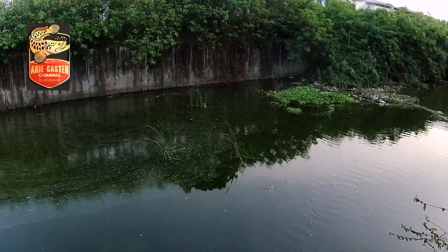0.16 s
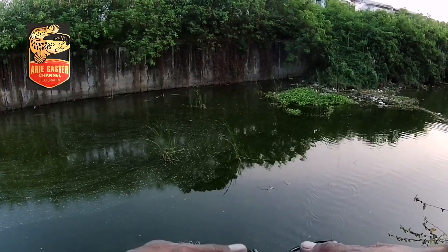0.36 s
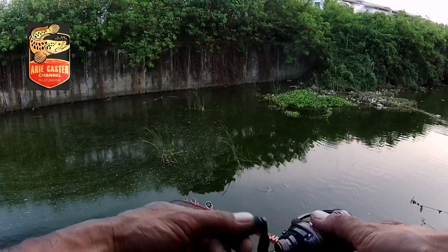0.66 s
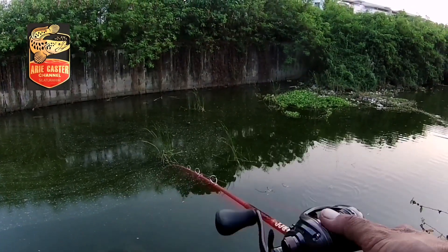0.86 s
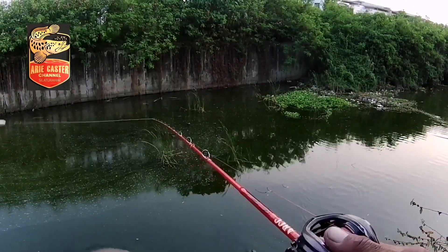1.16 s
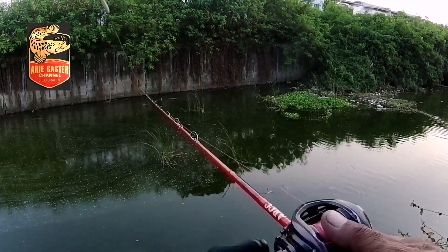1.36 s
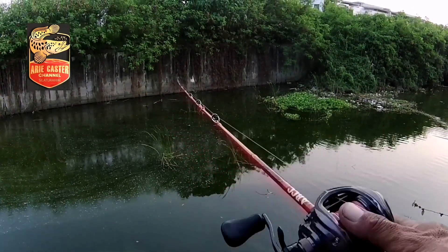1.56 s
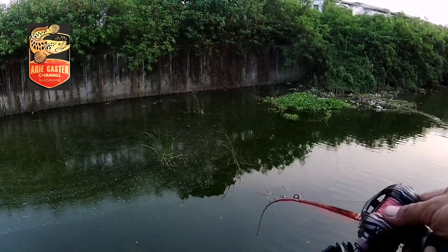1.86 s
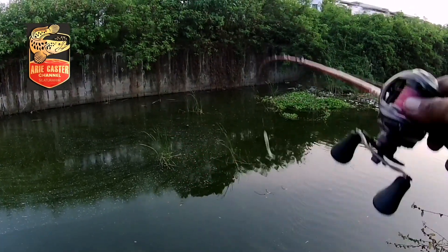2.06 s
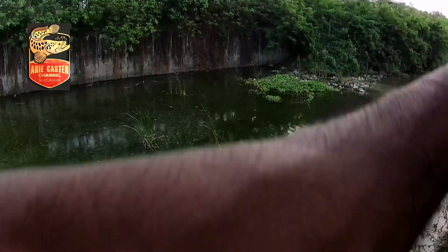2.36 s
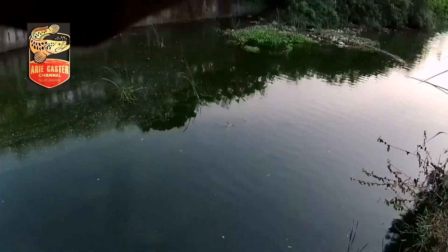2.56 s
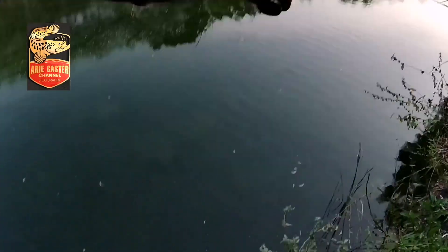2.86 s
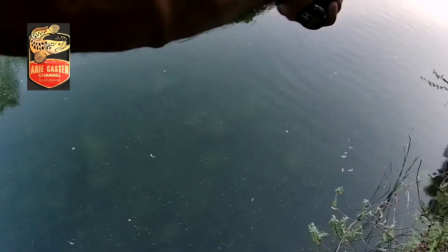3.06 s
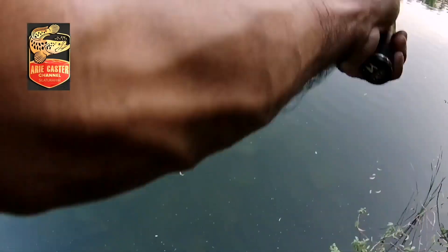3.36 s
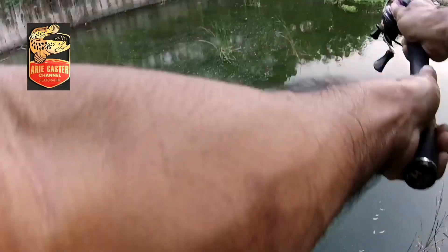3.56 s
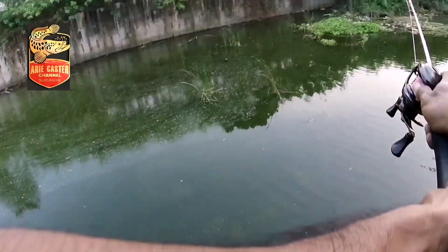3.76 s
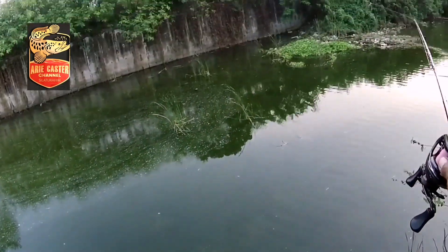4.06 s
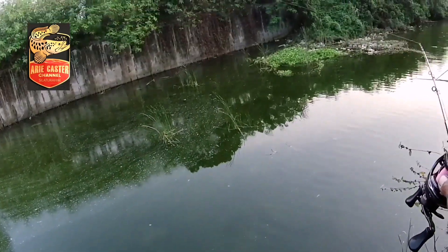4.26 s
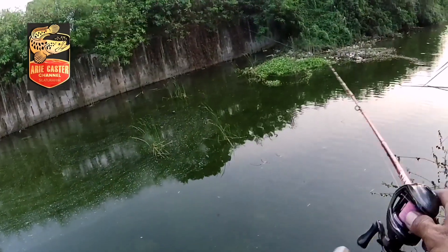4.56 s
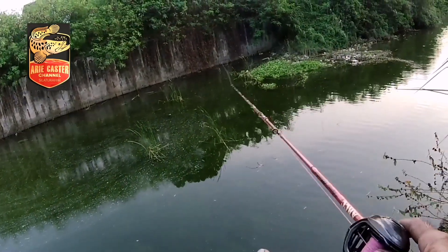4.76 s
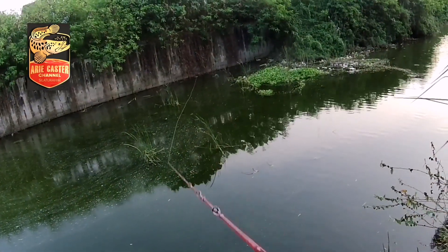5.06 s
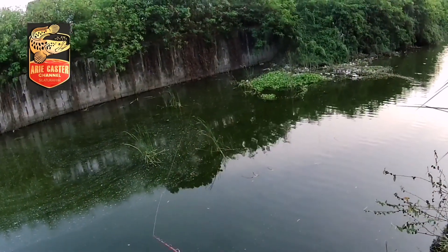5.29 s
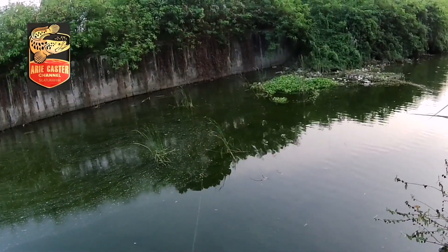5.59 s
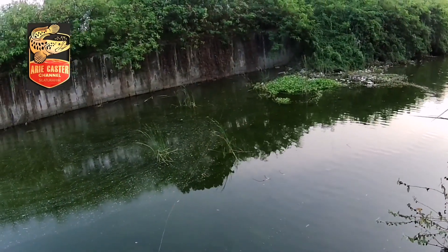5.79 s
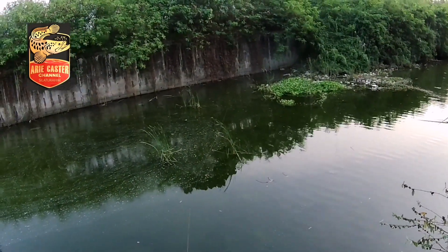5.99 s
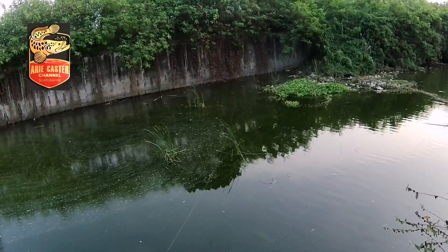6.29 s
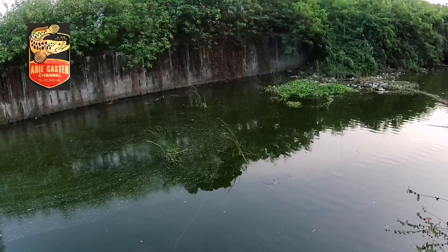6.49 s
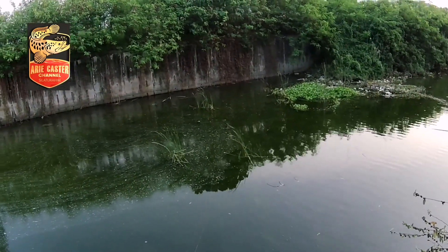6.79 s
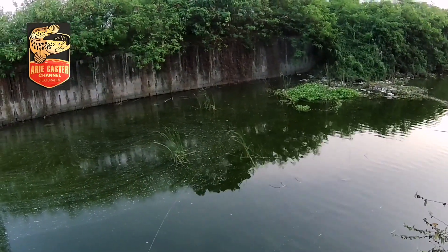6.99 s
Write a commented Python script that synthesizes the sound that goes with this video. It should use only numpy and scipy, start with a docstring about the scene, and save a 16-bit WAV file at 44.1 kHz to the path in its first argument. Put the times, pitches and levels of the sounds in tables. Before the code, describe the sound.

Mono, close and dry, heard from a small chest microphone beside a still canal, over a soft steady hush of far rumble, leaves and hiss. From 0 to 1.6 s hands rub the reel faintly, with small metallic ticks, clearest around 1.1 s. At 1.7 s line gives a tiny unsteady squeak, rising quickly, and at 1.88 s comes a crisp click. Very faint high peeps and a soft knock occur between 2.2 and 2.8 s. At about 2.85 s the rod whips forward: a short low buffet and climbing swish, dull thumps at 2.9 s, bright ticks to 3.0 s. The spool bursts into a bright, throbbing whir with thin line hiss, quickly softer, slowing and fading until 4.4 s with faint knocks. Quiet follows, then at 5.2 s the clutch snaps in, by far the loudest sound, with a tiny rattle. Two weak ticks follow before 5.7 s; only hush remains to about 7 s.

```python
"""Casting a fishing reel

A cast beside a still canal, heard by a small microphone on the chest. Hands rub the reel as filtered noise,
metal contacts ring the reel frame, and arm and rod throw gusts of gliding noise over the microphone.
The spool whirs as slaps and noise that follow its slowing turns, then the clutch snaps back in.
A squeak of line, dull knocks, faint peeps and a soft outdoor hush of coloured noise complete it."""
import sys
import numpy as np
from scipy import signal
from scipy.fft import rfft, irfft, next_fast_len
from scipy.io import wavfile

SR = 44100
rng = np.random.default_rng(int(sys.argv[2]) if len(sys.argv) > 2 else 0)


def materialize(psi):
    """Save the field psi as 16-bit PCM at rate SR to the path in sys.argv[1].

    A 1-D psi becomes a single channel; in a 2-D psi each row is a channel.
    """
    bounded = np.clip(np.atleast_2d(psi).T, -1, 1)
    quanta = np.round(bounded * 32767).astype(np.int16)
    wavfile.write(sys.argv[1], SR, quanta)


N = 314740
TIME = np.arange(N) / SR   # seconds


def spool():
    """Line slaps the guide as the spool turns, over a throbbing rush; hiss, bearing song and plate hum join."""
    # How the spool slows. Each row: time in seconds, turns per second, share of regular slaps from 0 to 1.
    turning = [(2.9, 300, .03), (3.1, 286, .1), (3.27, 254, .36), (3.42, 198, .32), (3.48, 196, .42),
               (3.57, 185, .4), (3.64, 168, .35), (3.78, 147, .25), (3.9, 122, .15), (3.95, 100, .1),
               (4.06, 86, .1), (4.15, 77, .05), (4.4, 66, .05)]
    # Loudness of the whir, a burst and then a slow fade. Each row: time in seconds, level in dB.
    whir_levels = [(2.9, -52), (2.928, -60), (2.94, -34), (2.975, -35), (3.012, -39.5), (3.042, -51.5),
                   (3.07, -47.5), (3.3, -48), (3.39, -49), (3.45, -50), (3.5, -58), (3.72, -57),
                   (4.05, -59), (4.14, -64.5), (4.4, -69)]
    # Tone colour of the whir. Each row: frequency in Hz, relative level in dB per Hz.
    whir_colour = [(900, -37), (1600, -19), (2300, -18), (3000, -11.5), (3800, -3.5), (4300, 2),
                   (5000, 0.5), (5500, -7.5), (6300, -20.5), (7400, -15.5), (9000, -18.5), (11000, -24),
                   (13000, -42), (16000, -40)]
    # Thin hiss of line in the guides. Each row: time in seconds, centre in Hz, width in Hz, level in dB.
    line_hiss = [(2.93, 7500, 4035, -75), (2.97, 8240, 4980, -61), (3.04, 8550, 3940, -70),
                 (3.08, 8400, 4510, -58.5), (3.2, 9600, 3586, -57.5), (3.33, 10500, 2560, -63),
                 (3.43, 11800, 2010, -56), (3.5, 11100, 1500, -63), (3.6, 10660, 1830, -62.5),
                 (4.0, 10000, 3010, -75.5)]

    rate, share = in_time(turning)
    turn = np.cumsum(rate * (1 + .002 * drift(40))) / SR
    throb = np.exp(.5 * np.cos(2 * np.pi * turn))

    # a second, weaker slap wanders around the turn, so single overtones swell and fade
    first = slap_train(turn, rate)
    second = slap_train(turn + .3 + .02 * drift(6), rate)
    slaps = band((first + .7 * second) * from_db(2.0 * drift(80)), 300, 7000)
    rush = throb * grains(2.5)
    mix = np.sqrt(share) * rms_one(slaps) + np.sqrt(1 - share) * rms_one(rush)

    # the loudness nods up and down, most strongly at one moment
    nod_s, nod_hz, nod_top_db, nod_fade_s = 3.17, 7.7, 3, .25
    since = TIME - nod_s
    nod_db = nod_top_db * np.cos(2 * np.pi * nod_hz * since) * np.exp(-np.abs(since) / nod_fade_s)
    nod_db = nod_db * (since > -.5 / nod_hz)

    whir_db = in_time(whir_levels)[0] + nod_db + 1.2 * drift(20)
    whir = colour(mix, whir_colour) * from_db(whir_db) * sounding(whir_levels)
    hz, width_hz, db = in_time(line_hiss)
    hiss = moving_band(hz, width_hz) * from_db(db + nod_db + 1.1 * drift(200)) * sounding(line_hiss)
    return whir + (hiss + bearing(rate) + plate(rate)) * throb * from_db(0.51 * drift(45))


def slap_train(turn, rate):
    """One click each time the count of turns passes a whole number, softer when the spool is fast."""
    from_whole = np.abs((turn + .5) % 1 - .5)
    return np.maximum(1 - from_whole * SR / rate, 0) / np.sqrt(rate)


def bearing(rate):
    """The bearing sings on a multiple of the turning rate; near a part that rings along, it bends and swells."""
    # Parts that ring along. Each row: pitch in Hz, reach in Hz, added level in dB, hold on the pitch from 0 to 1.
    ringing_parts = [(8470, 150, -81, 0.2), (6730, 240, -56.5, 0.87), (4900, 270, -49.5, 0.43),
                     (3850, 100, -65, 0.27)]
    multiple, start_s, end_s, free_db = 53.0, 3.67, 4.3, -72
    wide_hz, narrow_hz = 900, 259.6
    free_hz = multiple * rate
    hz, near, gain = free_hz, 0, from_db(free_db)
    for part_hz, reach_hz, db, hold in ringing_parts:
        close = np.exp(-((free_hz - part_hz) / (2 * reach_hz)) ** 2)
        hz = hz + hold * close * (part_hz - free_hz)
        near = near + close
        gain = gain + from_db(db) * close ** 2
    width_hz = wide_hz + (narrow_hz - wide_hz) * np.minimum(near, 1)
    return moving_band(hz, width_hz) * gain * between(start_s, end_s)


def plate(rate):
    """A side plate hums along: an overtone of the turning glides down onto its mode and stays there."""
    multiple, mode_hz, width_hz = 15.6, 2480, 200
    loudest_s, length_s, level_db = 3.72, .13, -63
    hum = moving_band(np.maximum(multiple * rate, mode_hz), np.full(N, width_hz))
    return hum * swells([loudest_s], [length_s], [level_db])


def ticks():
    """A contact chatters for a moment into all frame modes, hardest near its brightest pitch; then parts rattle."""
    # Metal contacts in the reel; the close group at 5.2 s is the clutch snapping in.
    # Each row: start in seconds, level in dB, brightest pitch in Hz,
    # loss in dB one octave away (it grows with the octaves squared; below 0 counts as 0), contact time in ms.
    metal_contacts = [(0.1111, -43, 4650, 19, 2.5), (.6863, -44.5, 4170, 13, 6.6),
                      (0.7326, -44.5, 4180, 21, 2.4), (0.9486, -38.5, 4160, 13, 1.6),
                      (1.0745, -30.5, 3430, 200, 8.1), (1.0765, -41, 8170, 200, 5),
                      (1.0790, -34.5, 6050, 400, 5.2), (1.1094, -37.5, 6400, 30, 2.5),
                      (1.112, -44.5, 2520, 25, 8.1), (1.1827, -45, 2800, 27, 12),
                      (1.2276, -44, 3580, 18, 6), (1.2625, -40.5, 4200, -3, 0.6),
                      (1.3793, -46.5, 4100, 6, 2), (1.4087, -46, 5500, 6, 2.5),
                      (1.5324, -43.5, 3530, 33, 4.3), (1.878, -60, 2700, 18, 1),
                      (1.8844, -16.5, 5400, 8.5, 0.17), (1.8892, -36, 5270, 5, 0.56),
                      (1.9015, -38, 5350, 30, 0.65), (1.9183, -39, 5500, 38, 0.56),
                      (2.8417, -33.5, 4760, 19, 2.6), (2.9447, -27, 4270, 25, 2.8),
                      (2.9584, -38, 4400, 8, 3.3), (2.972, -36, 6200, 20, 1.2), (2.986, -30, 4700, 4, 0.8),
                      (2.9957, -18.5, 4800, 37, 0.95), (3.0594, -35, 5500, 12, 3.6),
                      (3.1762, -34, 4570, 30, 6.4), (3.2111, -34, 4800, 14, 4.9),
                      (5.1362, -46.5, 6600, 24, 1.7), (5.1988, -16, 4200, 3, 1.1),
                      (5.2019, -1.5, 5030, 9, 0.67), (5.2029, -2, 5630, 9.5, 0.25),
                      (5.2052, -10.5, 6400, 20, 0.3), (5.2109, -7, 4200, 1.0, .15),
                      (5.2121, -10, 4300, 6, .6), (5.2110, -16.5, 2400, 40, 0.41),
                      (5.3322, -41.5, 4790, -2, 3.2), (5.6665, -45, 6500, 2.5, 1.4)]
    # Ringing modes of the reel frame. Each row: pitch in Hz, level in dB, seconds to fade by 60 dB.
    frame_modes = [(1850, -27.5, 0.0028), (2422, -8.5, 0.013), (2940, -16.5, 0.0035), (3360, -8.5, 0.011),
                   (3953, -3, 0.0064), (4228, 2, 0.0093), (4487, 2.5, 0.01), (4858, -10, 0.0081),
                   (5260, 4, 0.006), (5428, 0, 0.0056), (5880, -6, 0.0075), (7250, -9.5, 0.0064),
                   (7900, -10, 0.0066), (9650, -11.5, 0.0057), (11100, -7.5, 0.0049), (13600, -14, 0.0053),
                   (15400, -28, 0.00422)]
    # loose parts shiver on after a tick
    rattle_db, rattle_fade_s = -30, 0.15
    # the clutch spring bounces to rest: start, gap, first level and loss per bounce
    bounce_s, gap_s, bounce_db, loss_db = 5.215, .0048, -22.5, 7
    bounces = [(bounce_s + k * gap_s, bounce_db - k * loss_db, 5023, 5, 1.34) for k in range(5)]

    out = np.zeros(N)
    t = np.arange(round(.12 * SR)) / SR
    for s, db, bright_hz, fall_db, contact_ms in metal_contacts + bounces:
        chatter = rng.standard_normal(len(t)) * np.exp(-(1000 * t / contact_ms) ** 4)
        modes = 0
        for hz, mode_db, t60 in frame_modes:
            strength_db = mode_db - max(fall_db, 0) * np.log2(hz / bright_hz) ** 2
            modes = modes + from_db(strength_db - 60 * t / t60) * np.sin(2 * np.pi * hz * t)
        soft = modes * np.minimum(t / 0.00055, 1) ** 2   # the metal gives a little, so the rings swell
        struck = signal.fftconvolve(chatter, soft)[:len(t)]
        piece = band(band(struck, 1700, 19000), 1500, 19000)
        rattle = rng.standard_normal(len(t)) * from_db(rattle_db - 60 * t / rattle_fade_s)
        rattle = band(rattle, 3800, 5500)
        add(out, s, from_db(db) * (piece / np.abs(piece).max() + rattle))
    return out


def whip():
    """Arm and rod throw air: lumpy low buffeting, a swish above it, and the climbing swish of the rod tip."""
    # Gusts over the microphone. Each row: strongest moment in seconds, length in seconds,
    # buffeting level in dB, swish level in dB.
    gusts = [(2.647, 0.28, -69, -72.5), (2.8, 0.058, -56, -60.5), (2.835, 0.027, -42.5, -56),
             (2.86, 0.044, -37.5, -48), (2.944, 0.037, -40, -42.5), (2.98, .05, -48, -57),
             (3.017, .05, -47, -50.5), (3.051, 0.055, -45, -49), (3.151, .07, -55, -49.5),
             (3.252, 0.21, -63, -61), (3.7, 0.27, -68, -64), (3.922, 0.15, -61.5, -64.5),
             (4.115, 0.19, -71, -63.5)]
    s, length, buffet_db, swish_db = np.transpose(gusts)
    buffet = rms_one(band(band(rng.standard_normal(N), 70, 220), 55, 500))
    buffet = buffet * swells(s, length, buffet_db) * from_db(2.8 * drift(36))

    # each swish band is as wide as its centre is high
    steady_hz = np.full(N, 760.5)
    swish = moving_band(steady_hz, steady_hz) * swells(s, length, swish_db)

    # in the forward stroke the rod tip speeds up and its own swish climbs
    start_s, end_s, start_hz, end_hz, tip_db = 2.855, 2.895, 700, 2300, -49
    tip_hz = np.exp(np.interp(TIME, [start_s, end_s], np.log([start_hz, end_hz])))
    tip = moving_band(tip_hz, tip_hz) * from_db(tip_db) * between(start_s, end_s)
    return buffet + (swish + tip) * from_db(2.9 * drift(69))


def rubbing():
    """Hands and line rub on reel and rod: uneven grains of noise heard through broad rings of the frame."""
    # Single strokes. Each row: loudest moment in seconds, length in seconds, level in dB.
    strokes = [(0.0, 0.066, -55.5), (0.077, 0.075, -57.5), (.3, 0.68, -69), (0.67, 0.15, -61),
               (.755, 0.057, -58.5), (0.96, 0.25, -61.5), (1.1, .1, -59.5), (1.216, .13, -62),
               (1.344, 0.12, -62.5), (1.524, 0.037, -60), (1.767, 0.06, -60), (1.83, .04, -57),
               (1.902, 0.091, -61), (2.328, 0.046, -59.5), (2.805, .05, -58), (2.853, 0.087, -54.5),
               (2.934, 0.053, -49)]
    rub = grains(2.2)
    body = band(rub, 3700, 5600) + .8 * band(rub, 2300, 3200)
    return rms_one(body) * swells(*np.transpose(strokes))


def knocks():
    """A soft push of half a cycle rings one damped note and its upper neighbour."""
    # Dull knocks of the rod butt and of clothing near the microphone.
    # Each row: start in seconds, peak level in dB, pitch in Hz, seconds to fade by 60 dB.
    dull_knocks = [(.236, -50.5, 870, 0.022), (2.569, -49, 800, 0.029), (2.569, -42, 1990, 0.0019),
                   (2.9043, -25, 427, 0.032), (2.9086, -18, 1090, 0.0011), (2.9096, -18, 420, 0.028),
                   (2.9274, -14, 374, 0.0095), (3.182, -35, 630, 0.0086), (3.185, -27, 710, 0.018),
                   (3.21, -43, 500, 0.0064), (3.255, -45.5, 994, 0.056), (3.307, -45.5, 1120, 0.054),
                   (3.640, -47, 735, 0.018), (3.645, -48, 168, 0.016), (3.861, -51, 800, 0.015),
                   (3.956, -46.5, 790, 0.047), (4.061, -43.5, 860, 0.027), (4.099, -45, 800, 0.027),
                   (4.118, -51.5, 690, 0.048), (4.181, -42, 900, 0.026), (4.23, -46, 955, 0.015),
                   (4.377, -44.5, 220, .023), (5.203, -45, 810, 0.0096), (4.718, -46.5, 660, 0.011)]
    out = np.zeros(N)
    t = np.arange(round(.08 * SR)) / SR
    for s, db, hz, t60 in dull_knocks:
        push = -np.sin(np.pi * np.minimum(2 * hz * t, 1)) ** 2
        piece = ring(push, hz, t60) + .4 * ring(push, 1.7 * hz, .7 * t60)
        add(out, s, from_db(db) * piece / np.abs(piece).max())
    return out


def squeak():
    """Line sticks and slips over the thumb: an unsteady, throbbing tone, with a scrape that grows under it."""
    # The glide of the squeak. Each row: time in seconds, base pitch in Hz, level in dB before the partials' own.
    glide = [(1.69, 1020, -70), (1.706, 1135, -54), (1.722, 1247, -48), (1.745, 1295, -49),
             (1.754, 1290, -51), (1.762, 1260, -66)]
    hz, db = in_time(glide)
    phase = 2 * np.pi * np.cumsum(hz * (1 + 0.0228 * drift(250))) / SR
    tone = 0
    for multiple, partial_db in [(2, -30), (3, -7), (4, 2), (5, -12)]:
        tone = tone + from_db(partial_db + 3.7 * drift(150)) * np.sin(multiple * phase)
    scrape = rms_one(band(grains(3.3), 4240, 4600)) * np.clip((TIME - 1.715) / 0.019, 0, 1)
    return from_db(db) * sounding(glide) * (tone + 1.05 * scrape)


def peeps():
    """Short pure notes that rise a little."""
    # Faint peeps, perhaps a far bird.
    # Each row: start in seconds, length in seconds, pitch in Hz, rise in Hz, level in dB.
    faint_peeps = [(2.193, .02, 2500, 30, -65), (2.26, .015, 2500, 30, -69), (2.36, 0.017, 2500, 40, -64),
                   (2.664, 0.023, 2476, 40, -60.5), (2.758, 0.013, 2450, 80, -61)]
    out = np.zeros(N)
    for s, length, hz, rise_hz, db in faint_peeps:
        share = np.linspace(0, 1, round(length * SR))
        shape = np.sqrt(2 * np.sin(np.pi * share).clip(0))
        note = np.sin(2 * np.pi * np.cumsum(hz + rise_hz * share) / SR)
        add(out, s, from_db(db) * shape * note)
    return out


def hush():
    """Far traffic, leaves and microphone hiss as one noise; bass and middle waver a little on their own."""
    # Tone colour of the outdoor hush. Each row: frequency in Hz, relative level in dB per Hz.
    hush_colour = [(20, -29.5), (45, -7), (80, -6), (120, 1), (150, -4.5), (200, -6.5), (380, -14.5),
                   (1200, -19), (1900, -17), (2700, -14.5), (3500, -15.5), (4800, -12), (6000, -20.5),
                   (7200, -25), (15700, -25.5)]
    still = colour(rng.standard_normal(N), hush_colour) * from_db(-59.5)
    bass = band(still, 40, 400) * .12 * drift(6)
    middle = band(still, 1800, 6000) * .07 * drift(8)
    return still + bass + middle


def moving_band(hz, width_hz):
    """Two slow noises on a sine and a cosine make a noise band that can glide; rms about 0.8."""
    steps = np.cumsum(width_hz) / SR   # a wider band runs through its random values faster
    knots = rng.standard_normal((2, int(8000 * N / SR)))
    a, b = [np.interp(steps, np.arange(knots.shape[1]), row) for row in knots]
    phase = 2 * np.pi * np.cumsum(hz) / SR
    return a * np.sin(phase) + b * np.cos(phase)


def swells(s, length, db):
    """Gain over time of events that each rise to a peak and die away."""
    rise, fall = 0.49, 0.62   # shares of a length in which a swell gains, then loses, 10 dB
    power = np.zeros(N)
    for at, span, top in zip(s, length, db):
        near = slice(max(round((at - 2 * span) * SR), 0), max(round((at + 2 * span) * SR), 1))
        away = np.maximum((at - TIME[near]) / rise, (TIME[near] - at) / fall) / span
        power[near] += from_db(top - 10 * away ** 1.75) ** 2
    return np.sqrt(power)


def ring(push, hz, t60):
    """A resonance: a unit click would set a sine of about height 1 ringing and fading."""
    r, w = from_db(-60 / (t60 * SR)), 2 * np.pi * hz / SR
    return signal.lfilter([0, np.sin(w)], [1, -2 * r * np.cos(w), r * r], push)


def grains(spread_db):
    """Dense noise of uneven grain sizes."""
    return rng.standard_normal(N) * from_db(spread_db * drift(450))


def drift(rate):
    """Smooth random wandering of rms 1, slower for a lower rate in Hz."""
    r = np.exp(-2 * np.pi * rate / SR)
    wander = signal.lfilter([1], [1, -2 * r, r * r], rng.standard_normal(N + SR))
    return rms_one(wander[SR:])   # the first second lets the filter settle


def colour(x, spectrum):
    """Give a steady noise a spectrum; rms 1."""
    size = next_fast_len(N)
    hz = np.maximum(np.arange(size // 2 + 1) * SR / size, 1)
    points = np.array(spectrum)
    db = np.interp(np.log(hz), np.log(points[:, 0]), points[:, 1])
    return rms_one(irfft(rfft(x, size) * from_db(db), size)[:N])


def band(x, low_hz, high_hz):
    """Keep only the sound between two frequencies, with soft edges."""
    return signal.sosfilt(signal.butter(2, [low_hz, high_hz], "band", fs=SR, output="sos"), x)


def in_time(rows):
    """Each column after the time as a value per sample."""
    s, *columns = np.transpose(rows)
    return [np.interp(TIME, s, c) for c in columns]


def sounding(rows):
    """1 inside the time span of a table, with short fades."""
    return between(rows[0][0], rows[-1][0])


def between(start_s, end_s):
    """1 inside a span, with 10 ms fades in and out at its ends."""
    return np.clip(np.minimum(TIME - start_s, end_s - TIME) / .01, 0, 1)


def from_db(db):
    """Decibels to gain."""
    return 10 ** (np.asarray(db) / 20)


def rms_one(x):
    """Scale to rms 1."""
    return x / np.sqrt(np.mean(x ** 2) + 1e-20)


def add(out, s, piece):
    """Mix a short sound in at time s."""
    at = round(s * SR)
    out[at:at + len(piece)] += piece[:N - at]


def scene():
    """All sources, one channel."""
    reel = spool() + ticks() + rubbing() + squeak()
    return (reel + whip() + knocks() + peeps() + hush())[None]


def record(dry):
    """The loudest peaks are rounded, and the treble above 15.8 kHz is cut."""
    rounded = dry / (1 + np.abs(dry / .95) ** 6) ** (1 / 6)
    return signal.sosfilt(signal.ellip(10, .5, 70, 15800, fs=SR, output="sos"), rounded)


dry = scene()
out = record(dry)
materialize(out)
```